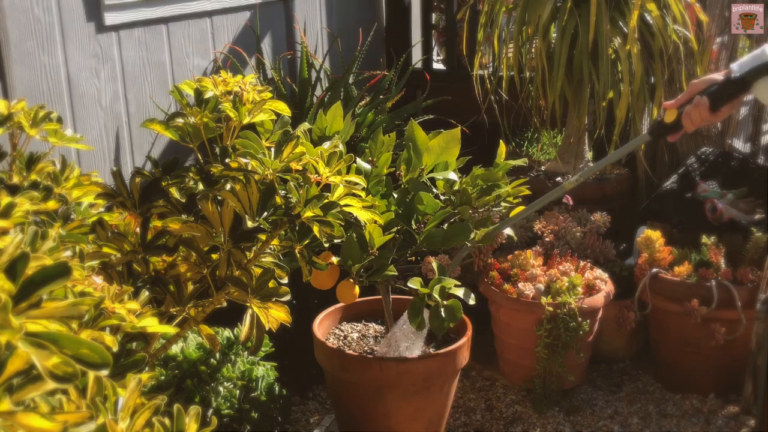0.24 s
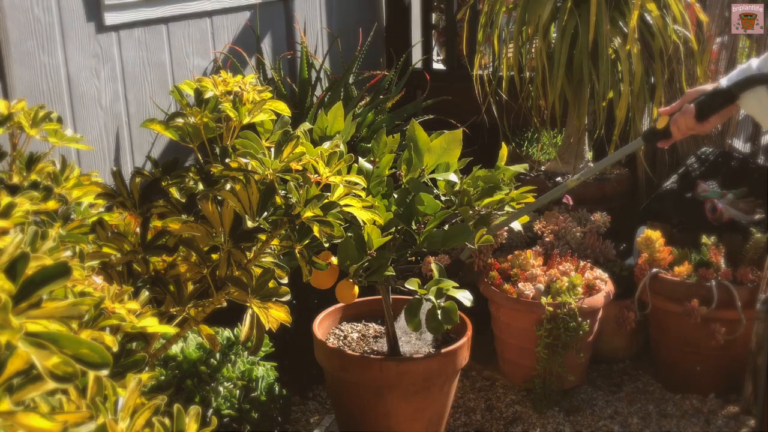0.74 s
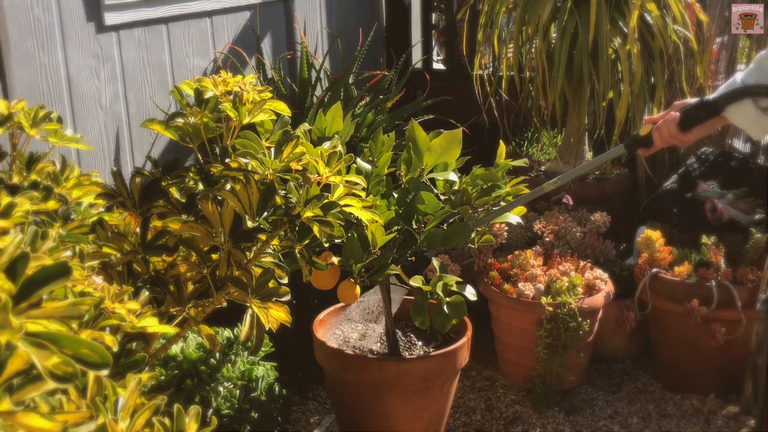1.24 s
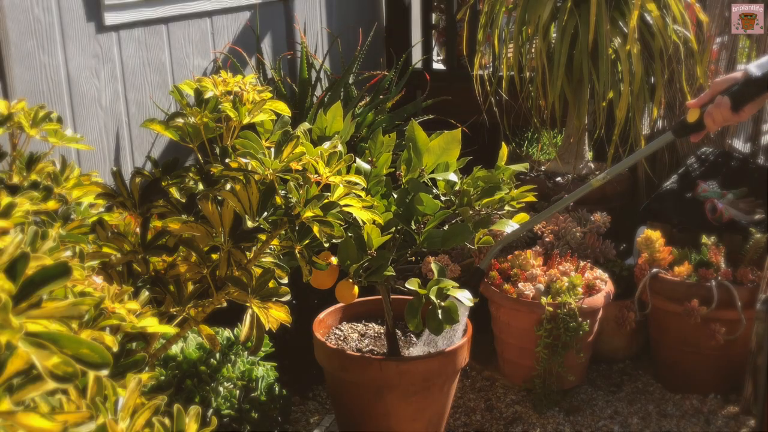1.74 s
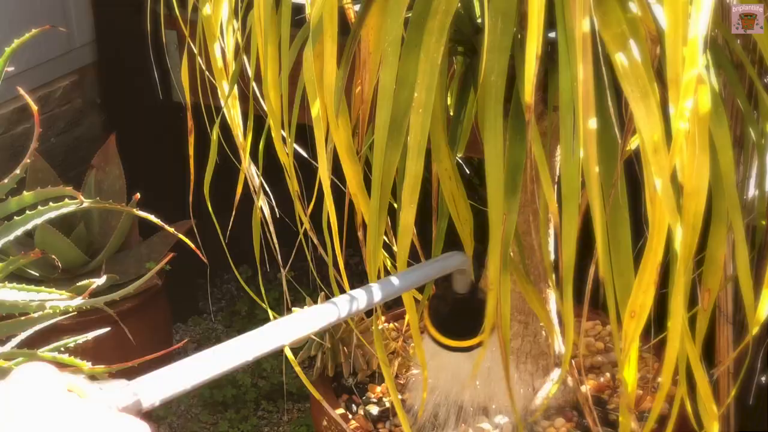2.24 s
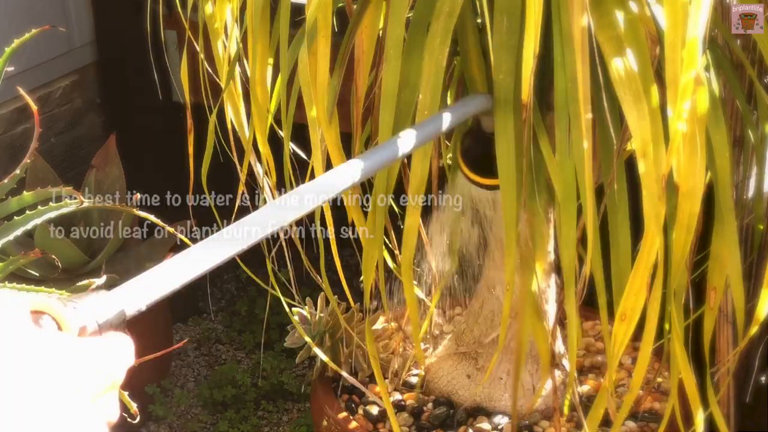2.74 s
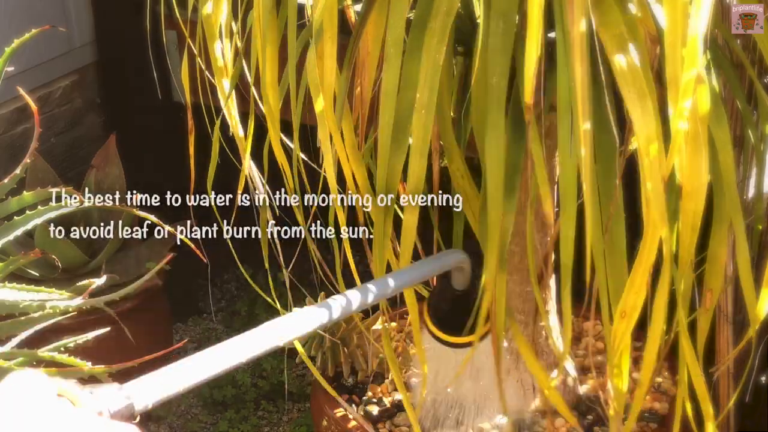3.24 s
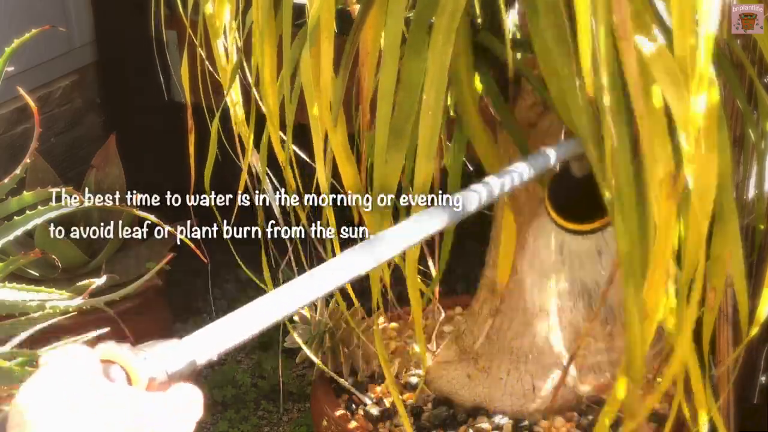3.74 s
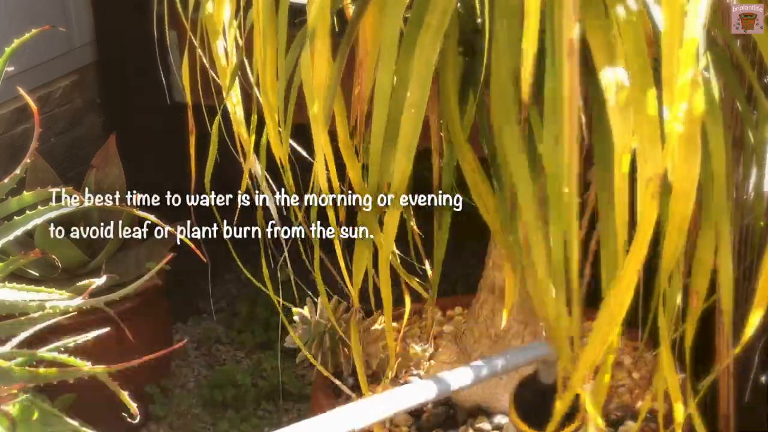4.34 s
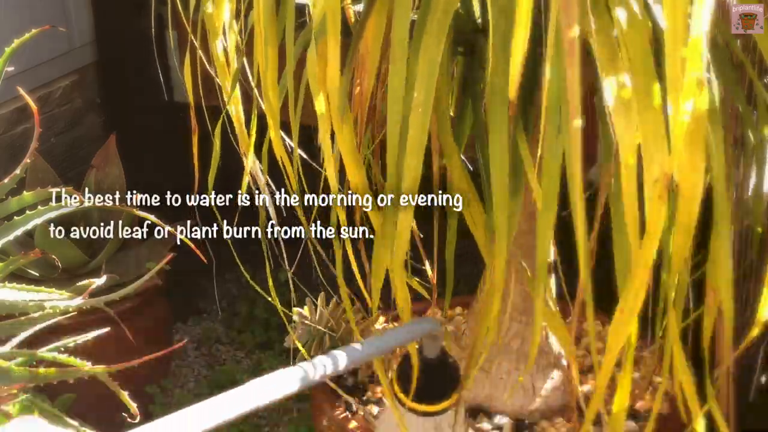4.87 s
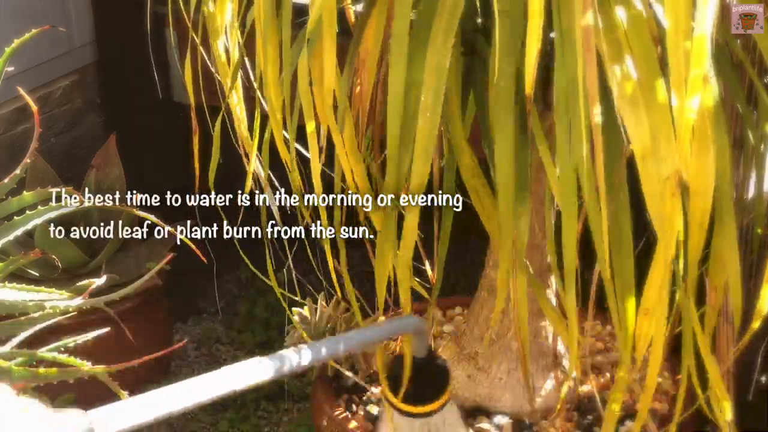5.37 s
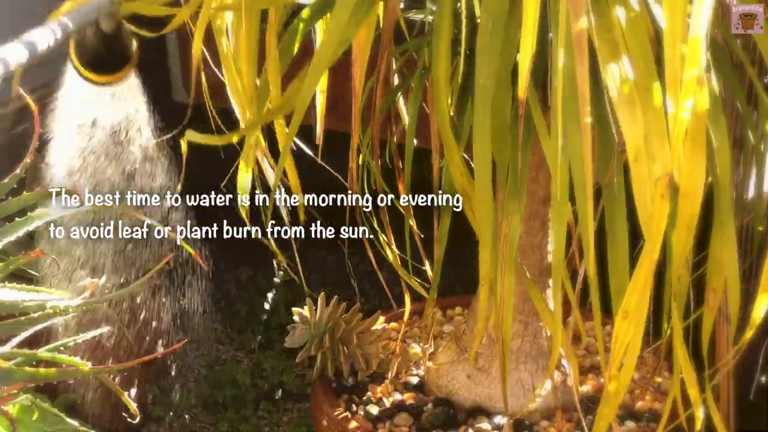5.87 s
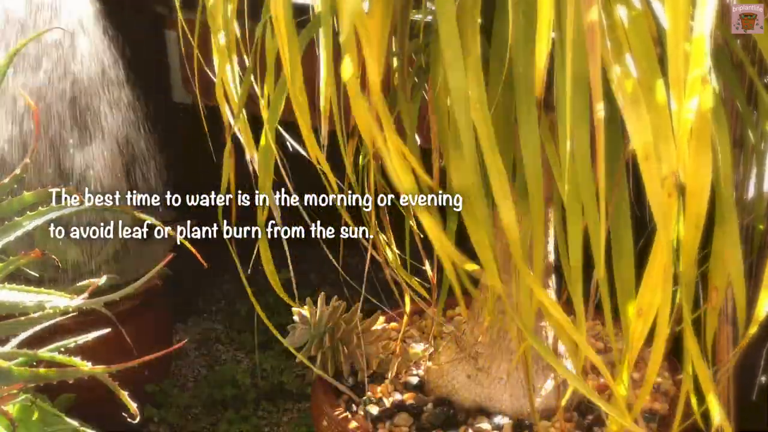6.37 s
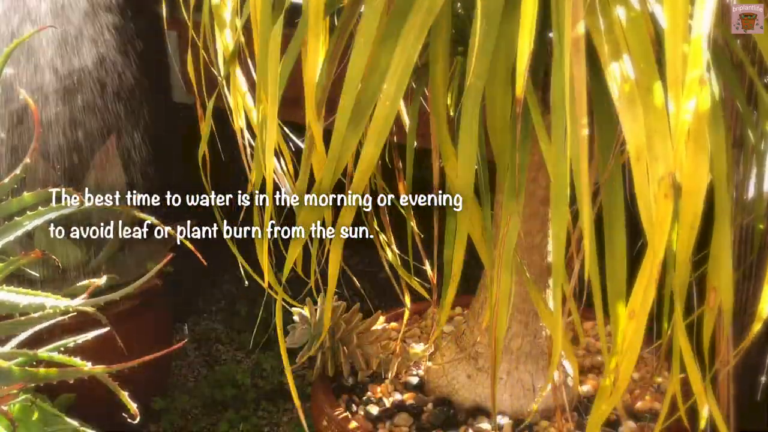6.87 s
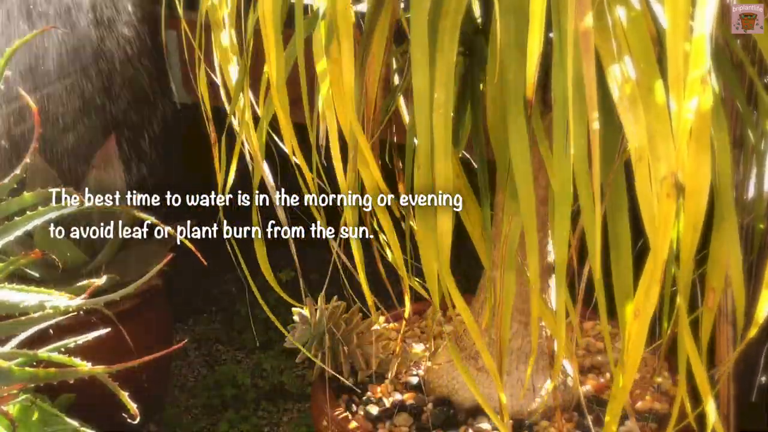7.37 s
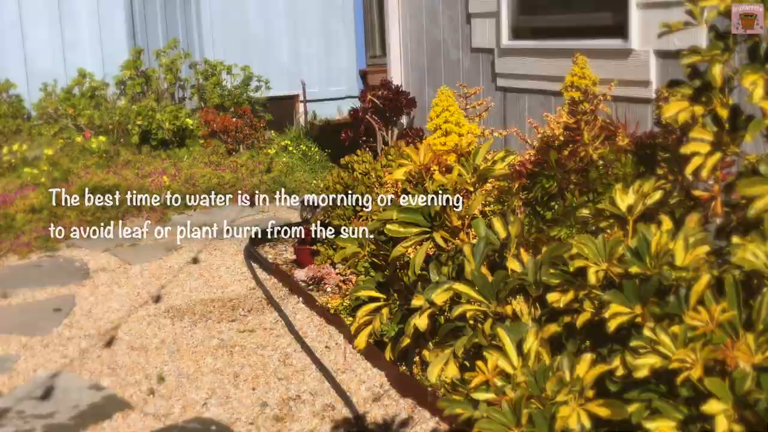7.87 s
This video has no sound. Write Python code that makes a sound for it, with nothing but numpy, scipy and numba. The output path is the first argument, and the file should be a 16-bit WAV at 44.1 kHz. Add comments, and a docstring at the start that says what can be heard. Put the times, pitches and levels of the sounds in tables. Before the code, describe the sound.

Hose spray hisses into a pot over a faint hum, then splatters loudly close up on leaves, drifts away, and cuts to near silence.

```python
"""A garden with potted plants, watered by a hose wand in three scenes that cut straight into each other:
a citrus pot a few steps away with a machine humming; close up, spray sweeping over long leaves and then
swinging off to a farther bed; a quiet path with a faint bird. Thousands of short damped tones make the
drop impacts, fizz, bubbles and drumming leaves. Noise bursts make single fat drops and faint hisses, shaped
noise makes the open air, and gliding tones make the hum and the bird."""
import sys
import numpy as np
from scipy import signal
from scipy.fft import rfft, irfft, next_fast_len
from scipy.io import wavfile
from scipy.ndimage import uniform_filter1d, map_coordinates
from numba import njit

SR = 44100
rng = np.random.default_rng(int(sys.argv[2]) if len(sys.argv) > 2 else 0)


def file_out(sig):
    """Save sig as 16-bit WAV at sys.argv[1]."""
    # one column per channel
    cols = np.atleast_2d(sig).T
    # limit, then scale
    lim = np.clip(cols, -1, 1)
    pcm = np.round(lim * 32767).astype(np.int16)
    wavfile.write(sys.argv[1], SR, pcm)


N = 357651
T = np.arange(N) / SR  # time of each sample in seconds

CUT_CLOSE, CUT_PATH = 2.276, 7.642  # starts of the second and third scene, s
TOP_HZ = 15850  # upper edge of the treble
# Bands in which a coloured layer has its stated level: lowest and highest Hz
SPLASH_BAND, FINE_BAND, BED_BAND = (4700, 8500), (9000, 15800), (3000, 8500)
LEAF_BAND, SOIL_BAND, AIR_BAND = (1800, 2400), (180, 330), (400, 1400)
REFERENCE_DB = -50  # splash level at which the fine droplets are just as loud, before any offset
SHATTER = 1.25  # dB of fine droplets per dB of splash: a harder stream breaks up finer
POT_FINE_DB, BRUSH_FINE_DB = -3, 5  # offset of the fine droplets in the pot; fine against splash on foliage
LEAF_BUBBLE_DB = -8  # steady bubbling against the splash
DRUM_DB = -69  # stray drops drumming on the long leaves between sweeps
LEAF_BEND = .03  # share by which the pitch of the leaves wanders as they bend under the water
PATCH_HZ = 1100  # spacing of the bands that flicker separately
PATCH_DEPTH, SURGE_DEPTH = 1.1, .75  # share of the flutter in each band, and in the whole stream
HUM_HZ, HUM_DB, HUM_FADE_DB_PER_S = 115.7, -68.5, 0.1
YARD_DB, PATH_DB = -68.5, -81  # open air in the first scene, and at the start of the third
PATH_SWELL_DB_PER_S = 13.5  # the air along the path starts hushed and grows
CHIRP_ROUGH_DB = 5  # how much the bird's level flickers
PUDDLE_HZ, PUDDLE_SPREAD = 4000, .06  # bubble pitch before tuning, and the share it varies either way
TICK_SPREAD = 0.00023  # octaves times decay in s: the longer a drop rings, the purer its pitch
TICK_CRACK_DB, SPLAT_CRACK_DB = -12.5, -7.5  # broad crack of a bursting drop, against its pitched part
PLINK_SPLASH_DB = -5.5  # little splash that opens each bubble, against its ring


def undb(db):
    """Turn decibels into gain."""
    return 10 ** (np.asarray(db) / 20)


def curves(table):
    """Join the values in each column of a table by straight lines in time."""
    s, *columns = np.transpose(table)
    return [np.interp(T, s, c) for c in columns]


def walk(count):
    """Smooth chance with count turns a second and a spread near 1."""
    k = SR // count
    steps = np.repeat(rng.standard_normal(N // k + 1), k)
    return 0.956 * uniform_filter1d(uniform_filter1d(steps, k), k)[:N]


def colour(x, points, band):
    """Give x a spectrum of (Hz, dB) points, with rms 1 inside the band; it falls away beyond both ends."""
    size = next_fast_len(N, True)
    f = np.maximum(np.arange(size // 2 + 1) * SR / size, 1)
    hz, db = np.transpose(points)
    ends = (np.minimum(hz[-1] / f, 1) * np.minimum(f / hz[0], 1)) ** 2
    shaped = rfft(x, size) * undb(np.interp(np.log(f), np.log(hz), db)) * ends
    inside = (f > band[0]) & (f < band[1])
    return irfft(shaped, size)[:N] * size / np.sqrt(2 * np.sum(np.abs(shaped[inside]) ** 2))


@njit
def ring(start, hz, cycles, size, glide):
    """Damped sines that lose 60 dB in the given cycles while their pitch rises by the share glide."""
    out = np.zeros(N)
    for k in range(len(start)):
        length = cycles[k] * SR / hz[k]
        first = int(start[k] * SR) + 1
        for i in range(max(first, 0), min(first + int(length) + 1, N)):
            age = i - start[k] * SR
            u = age / length
            phase = 2 * np.pi * hz[k] / SR * age * (1 + glide * u / 2)
            out[i] += size[k] * np.exp(-6.9 * u) * np.sin(phase)
    return out


def drops(lo_hz, hi_hz, ring_s, spread_db, glide, count):
    """A shower of count damped tones at random moments, each with its own pitch, size and length; rms 1."""
    when, pitch, weight, damping = rng.random((count, 4)).T
    hz = lo_hz + (min(hi_hz, .45 * SR) - lo_hz) * pitch
    rarity = -np.log(.02 + weight)  # near 0 for most drops, large for a few
    cycles = hz * ring_s * (.5 + damping)
    x = ring(when * N / SR, hz, cycles, undb(spread_db * rarity), float(glide))
    return x / np.std(x)


def burst(start, hz, octaves, decay_s, rise_s):
    """A dense burst too thick to tell apart: a swell and decay of noise around one pitch, peak 1."""
    t = T[:8192]
    f = np.maximum(np.arange(len(t) // 2 + 1) * SR / len(t), 1)
    around_pitch = np.exp(-.5 * (np.log2(f / hz) / octaves) ** 2)
    x = irfft(rfft(rng.standard_normal(len(t))) * around_pitch)
    x *= (1 - np.exp(-t / rise_s)) * np.exp(-t / decay_s)
    out, first = np.zeros(N + len(t)), int(start * SR)
    out[first:first + len(t)] = x / np.abs(x).max()
    return out[:N]


def scatter(x, t60, wet_db, count=3):
    """Pots, leaves and fence throw back a short tail; drops land in count places, each with its own echo."""
    t = T[:SR // 8]
    echo = 0
    for _ in range(count):
        tail = rng.standard_normal(len(t)) * undb(-60 * t / t60)
        share = np.cos(2 * np.pi * walk(count=40))  # the landing place wanders with the stream
        echo = echo + signal.oaconvolve(x * share, tail / np.linalg.norm(tail))[:N]
    return x + undb(wet_db) * echo * np.sqrt(2 / count)


def scene_gain(start, end, fade_s):
    """Gain of a scene that fades in quickly and stops dead."""
    return np.clip((T - start) / fade_s, 0, 1) ** 3 * (T < end)


def swell(middle_s, length_s):
    """The stream slides onto something and off again: a bell of power, half as strong at its two ends."""
    return .5 ** ((2 * (T - middle_s) / length_s) ** 2)


def passes(steady_db, rows, gain_db=0):
    """Gain of a layer: its steady level plus a swell for each (middle s, length s, dB) row, as powers."""
    swells = sum(undb(db + gain_db) ** 2 * swell(s, length) for s, length, db in rows)
    return np.sqrt(undb(steady_db) ** 2 + swells)


def shattered(flow_db):
    """Level of the fine droplets, which grows faster than the splash."""
    return REFERENCE_DB + SHATTER * (flow_db - REFERENCE_DB)


def patter(x, flutter_db):
    """Each clump of water strikes its own leaf or stone, so neighbouring bands flicker separately."""
    size = next_fast_len(N, True)
    spectrum = rfft(x, size)
    place = np.arange(len(spectrum)) * SR / size / PATCH_HZ
    out = 0
    for k in range(TOP_HZ // PATCH_HZ + 2):
        band = irfft(spectrum * np.maximum(1 - np.abs(place - k), 0), size)[:N]
        out = out + band * undb(PATCH_DEPTH * flutter_db * walk(count=85))
    # The flicker adds power on average; take that off again
    mean_power_db = (PATCH_DEPTH * flutter_db) ** 2 * np.log(10) / 20
    return out * undb(SURGE_DEPTH * flutter_db * walk(count=55) - mean_power_db)


def shower(click_spread_db, fizz_db, spatter_db, spatter_ring_s, wet_db):
    """Sharp impacts and the fizz of tiny bubbles; where the stream breaks into clumps, big drops spatter."""
    # How much the stream breaks into clumps. Each row: time in seconds, strength of the flutter.
    clumps = [(0, 1.2), (2.3, 1.4), (3.3, 0.8), (3.5, 3.3), (3.85, 3.5), (4.0, 1.0), (4.2, 3.5),
              (5.35, 2.8), (5.7, 1)]
    flutter_db, = curves(clumps)
    clicks = drops(730, 16900, ring_s=0.00052, spread_db=click_spread_db, glide=0, count=40000)
    fizz = drops(2780, 15870, ring_s=0.017, spread_db=6, glide=0.025, count=14000)
    big = drops(3400, 15500, ring_s=spatter_ring_s, spread_db=4.5, glide=0.04, count=4200)
    # Each big drop gets a short noisy tail, as it shatters into smaller ones
    spatter = scatter(big, t60=0.034, wet_db=-5.5) / 2
    share = undb(spatter_db) * flutter_db
    mix = clicks + undb(fizz_db) * fizz + share * spatter
    water = mix / np.sqrt(1 + undb(2 * fizz_db) + share ** 2)
    return scatter(patter(water, flutter_db), t60=0.063, wet_db=wet_db, count=2)


def citrus_pot():
    """The shower falls into a pot a few steps away and brushes the low foliage."""
    # How hard the stream lands in the pot. Each row: time in seconds, splash level in dB.
    flow = [(0, -48), (0.17, -51.5), (0.27, -56), (0.6, -54.5), (0.75, -56.5), (0.95, -53), (1.12, -63),
            (1.55, -60.5), (1.72, -63.5), (2.26, -61.5)]
    # Spray on the low foliage. Each row: middle in seconds, length in seconds, splash level in dB.
    brushes = [(0.107, 0.4, -62), (0.84, 0.051, -55.5), (1.327, 0.13, -69.5), (1.533, 0.1, -66)]
    # Tone of the splash, then of the fine droplets. Each row: frequency in Hz, relative level in dB.
    splash_tone = [(900, -29), (1700, -22), (2700, -16), (3400, -1.5), (3900, 2), (4350, -6), (4750, -0.5),
                   (5400, 1), (6300, -3.5), (7300, -1.5), (8400, -5), (10000, -14.5), (15000, -21)]
    fine_tone = [(5000, -40), (8500, -23), (10000, -8), (11500, -2.5), (13000, -2), (15300, 2)]
    flow_db, = curves(flow)
    water = shower(click_spread_db=-0.5, fizz_db=-5.0, spatter_db=-4.5, spatter_ring_s=0.0077, wet_db=-0.5)
    splash = passes(flow_db, brushes) * colour(water, splash_tone, SPLASH_BAND)
    fine_gain = passes(shattered(flow_db) + POT_FINE_DB, brushes, BRUSH_FINE_DB)
    fine = fine_gain * colour(water, fine_tone, FINE_BAND)
    return (splash + fine) * (T < CUT_CLOSE)


def air(points, db, waver_db):
    """Open-air rumble and murmur of the neighbourhood: shaped noise, gently wavering."""
    return undb(db + waver_db * walk(count=9)) * colour(rng.standard_normal(N), points, AIR_BAND)


def hum():
    """A machine behind the fence hums one low tone, a little unsteady and slowly weakening."""
    phase = 2 * np.pi * np.cumsum(HUM_HZ * (1 + 0.0078 * walk(count=10))) / SR
    level_db = HUM_DB - HUM_FADE_DB_PER_S * T + 0.43 * walk(count=12)
    return np.sqrt(2) * undb(level_db) * np.sin(phase)


def puddles():
    """Where the stream digs in, bubbles of nearly one size ring together; each puddle has its own pitch."""
    # Puddles stirred up. Each row: middle in seconds, length in seconds, level in dB, pitch in Hz.
    stirred = [(0.328, 0.088, -52.5, 3900), (0.53, 0.24, -53.5, 3875), (0.849, 0.064, -58, 3780),
               (1.858, 0.045, -52.5, 4010), (1.983, 0.087, -51, 3870), (2.61, 0.087, -47, 4320),
               (3.609, 0.18, -52, 4010), (3.845, 0.17, -50, 3650), (4.391, 0.087, -48.5, 3938),
               (4.59, 0.06, -50, 4124), (4.75, 0.12, -56, 3500), (5.452, 0.034, -64, 4180)]
    *_, hz = curves(stirred)
    lo_hz, hi_hz = PUDDLE_HZ * (1 - PUDDLE_SPREAD), PUDDLE_HZ * (1 + PUDDLE_SPREAD)
    bubbles = drops(lo_hz, hi_hz, ring_s=0.061, spread_db=3.5, glide=0.039, count=6000)
    # Playing the bubbles faster or slower tunes them
    tuned = map_coordinates(bubbles, [np.cumsum(hz / PUDDLE_HZ)], mode="mirror")
    return passes(-np.inf, [(s, length, db) for s, length, db, _ in stirred]) * tuned


def crack(start, decay_s):
    """The broad, bright burst of a drop breaking up; peak 1."""
    return burst(start, 8500, octaves=.75, decay_s=decay_s, rise_s=.0002)


def leaf_ticks():
    """Single drops snap on a leaf: a crack and, just after it, a short pitched burst."""
    # Each row: start in seconds, peak of the pitched part in dB, pitch in Hz, decay time in seconds.
    ticks = [(3.1168, -19, 9560, .0012), (3.9564, -23, 13500, .0007), (4.2388, -29, 14800, .002),
             (4.5341, -35, 7070, .002), (5.0868, -31, 10500, .002), (5.3838, -34, 12400, .002),
             (5.4585, -35, 13300, .002), (6.8174, -30.5, 10000, .001), (6.868, -42.5, 9200, .004),
             (7.078, -44, 8860, .005), (7.1125, -41, 9550, .004), (7.195, -49, 14200, .005),
             (7.2754, -41, 9000, .002), (7.7533, -42.5, 12800, .0014), (7.8735, -46, 8300, .0018),
             (7.9054, -55, 6470, .002), (8.0137, -54, 13200, .0015), (8.0691, -51, 7540, .002)]
    out = 0
    for s, db, hz, decay in ticks:
        pitched = burst(s + 0.00052, hz, octaves=TICK_SPREAD / decay, decay_s=decay, rise_s=0.00051)
        out = out + undb(db) * (pitched + undb(TICK_CRACK_DB) * crack(s, decay))
    return out


def splats():
    """Clumps of water slap down: a stronger crack, then a pitched burst."""
    # Each row: start in seconds, peak of the burst in dB, centre in Hz, decay time in seconds.
    slaps = [(0.828, -45, 3830, .004), (1.3457, -43, 5140, 0.01), (2.8215, -27, 5350, 0.0035),
             (3.031, -31, 7000, .003), (3.4362, -35, 3800, 0.01), (3.4955, -28, 3750, 0.005),
             (3.539, -38, 4600, .007), (3.5755, -30.5, 4200, 0.0042), (3.608, -36, 6900, 0.0045),
             (3.631, -38, 5200, 0.007), (3.713, -39, 6600, .005), (3.774, -31.5, 4600, 0.007),
             (3.806, -33, 12600, 0.0043), (3.9295, -27, 4600, 0.0025), (4.139, -36.5, 6230, .004),
             (4.16, -34, 4350, 0.011), (4.394, -32.5, 4300, 0.0047), (4.5692, -37.5, 4230, .012),
             (4.784, -31.5, 6800, 0.0059), (5.151, -41, 4400, .004), (5.1545, -34, 14100, 0.004),
             (5.1925, -33, 4300, 0.0041), (5.199, -32.5, 7050, 0.0024), (5.2555, -29.5, 8200, 0.005),
             (5.2806, -32, 7100, 0.0023), (5.325, -36, 7100, .005), (5.399, -34.5, 6100, 0.0039)]
    out = 0
    for s, db, hz, decay in slaps:
        pitched = burst(s + .001, hz, octaves=.2, decay_s=decay, rise_s=.0006)
        out = out + undb(db) * (pitched + undb(SPLAT_CRACK_DB) * crack(s, decay))
    return out


def plinks():
    """Larger bubbles in the puddles: a little splash, then a ring that rises slightly in pitch."""
    # Each row: start in seconds, level of the ring in dB, pitch in Hz.
    bubbles = [(1.763, -43, 4040), (1.8476, -43, 3700), (4.4246, -38, 3512), (4.624, -36, 4480),
               (5.031, -44, 4130), (5.5872, -46.5, 4930), (5.9383, -40, 3994), (6.795, -53, 2930),
               (6.866, -45.5, 3780), (6.913, -45, 4400), (7.049, -47, 3650), (7.0785, -45.5, 4020)]
    starts, levels_db, pitches = np.transpose(bubbles)
    out = ring(starts + 0.001108, pitches, 0.048 * pitches, undb(levels_db), 0.033)
    for s, db, hz in bubbles:
        splash = burst(s, 1.01 * hz, octaves=0.23, decay_s=0.0029, rise_s=0.0016)
        out = out + undb(db + PLINK_SPLASH_DB) * splash
    return out


def pats():
    """Hollow pats of the jet on leaves and into the soil: noise bursts that rise softly."""
    # Each row: start in seconds, peak in dB, centre in Hz, width in octaves, decay time in seconds.
    hits = [(4.415, -51, 245, .18, .03), (4.475, -48.5, 2180, .12, 0.015),
            (4.818, -48.5, 2090, .12, 0.0093), (5.119, -52, 750, .55, 0.008),
            (5.119, -51, 1680, .18, 0.006), (5.938, -49, 780, .65, 0.0038), (7.27, -62, 270, 0.2, 0.035),
            (7.295, -56.5, 1040, 0.17, 0.034), (7.627, -53, 2700, .16, .004)]
    return sum(undb(db) * burst(s, hz, octaves=width, decay_s=decay, rise_s=decay / 2)
               for s, db, hz, width, decay in hits)


def fat_drops():
    """Drops that stand out from the shower, with a short echo from their surroundings."""
    return scatter(splats() + plinks() + leaf_ticks() + pats(), t60=0.097, wet_db=-8)


def bend(x, share):
    """Let the pitch of x wander by a share."""
    place = np.cumsum(1 + share * walk(count=14))
    return map_coordinates(x, [place], order=1, mode="mirror")


def long_leaves():
    """Close up, the shower drums on strap leaves and bubbles in the soil under them."""
    # How hard the stream lands under the leaves. Each row: time in seconds, splash level in dB.
    flow = [(2.3, -46), (2.74, -51), (3.05, -47.5), (3.38, -46.5), (3.56, -51), (3.72, -54), (3.88, -47),
            (4.14, -51.5), (4.24, -55), (4.38, -50.5), (4.51, -59), (4.68, -55), (4.95, -60), (5.42, -56),
            (5.7, -68.5)]
    # The wand sweeps across the leaves. Each row: middle in seconds, length in seconds,
    # splash level in dB, drumming level in dB.
    sweeps = [(2.33, 0.12, -45.5, -63.5), (3.21, 0.2, -47.5, -54), (4.005, 0.14, -43, -58),
              (4.725, 0.07, -55, -63.5), (4.815, 0.1, -50, -67.5), (5.295, 0.1, -48, -66.5)]
    # Tones of splash, fine droplets and drummed leaves. Each row: frequency in Hz, relative level in dB.
    splash_tone = [(900, -46), (1600, -41), (2650, -19.5), (3050, -3.5), (3350, 6), (4250, 5), (4900, 6.5),
                   (6100, 4.5), (7600, 6.5), (9000, 1.5), (11000, -33), (15000, -0.5)]
    fine_tone = [(5000, -60), (8000, -11.5), (9300, 0.5), (11500, 5), (13500, 3), (15500, 4.5)]
    leaf_tone = [(1000, -37), (1650, -4), (1880, -13.5), (2080, 3.5), (2300, -15), (2600, -4), (3600, -13)]
    flow_db, = curves(flow)
    splashing = [(s, length, db) for s, length, db, _ in sweeps]
    drumming = [(s, length, db) for s, length, _, db in sweeps]
    water = shower(click_spread_db=0.5, fizz_db=-8.0, spatter_db=-2.5, spatter_ring_s=.0075, wet_db=-1.0)
    splash = passes(flow_db, splashing) * colour(water, splash_tone, SPLASH_BAND)
    fine = passes(shattered(flow_db), splashing) * colour(water, fine_tone, FINE_BAND)
    bubbling = drops(3324, 4518, ring_s=0.068, spread_db=1.5, glide=0.11, count=3500)
    bubbles = undb(flow_db + LEAF_BUBBLE_DB) * bubbling
    taps = drops(1810, 2660, ring_s=0.0071, spread_db=0.5, glide=0, count=7000)
    drum = passes(DRUM_DB, drumming) * bend(colour(taps, leaf_tone, LEAF_BAND), LEAF_BEND)
    return splash + fine + bubbles + drum


def far_bed():
    """Farther off the shower is a smooth wash heard mostly by its echo, while wet leaves nearby drip."""
    # Spray that misses the big pot. Each row: time in seconds, splash level in dB, fine droplets in dB.
    bed = [(4.2, -56.5, -88), (4.75, -55, -85), (5.0, -58, -81), (5.35, -54.5, -72), (5.7, -60, -80),
           (5.946, -61.5, -77), (6.582, -63.5, -68.5), (7.03, -61.5, -70), (7.228, -61, -67),
           (7.486, -64, -73.5), (7.62, -62.5, -70)]
    # Tone of the wash, then of the drips. Each row: frequency in Hz, relative level in dB.
    wash_tone = [(900, -10.5), (1600, -10.5), (2150, -2.5), (2900, -5.5), (3300, 1.5), (3600, -1),
                 (4250, 2.5), (4900, -0.5), (5600, -4), (7200, -6), (9000, -12.5), (14000, -17.5)]
    drip_tone = [(6000, -24), (8000, -11), (9700, -10), (12000, -11), (15000, -4)]
    splash_db, fine_db = curves(bed)
    impacts = drops(1210, 14000, ring_s=0.002, spread_db=2.0, glide=0, count=50000)
    wash = colour(scatter(impacts, t60=0.078, wet_db=7.0, count=2), wash_tone, BED_BAND)
    dripping = drops(4200, 16200, ring_s=0.004, spread_db=3, glide=0, count=6000)
    drips = colour(scatter(dripping, t60=0.063, wet_db=-1), drip_tone, FINE_BAND)
    return undb(splash_db) * wash + undb(fine_db) * drips


def soil():
    """The jet pounds the potting soil of the big pot with soft low thuds."""
    # How hard it pounds. Each row: time in seconds, level in dB.
    pounding = [(2.35, -79), (2.5, -69), (3.4, -72.5), (3.55, -69.5), (4.05, -67.5), (4.3, -64.5),
                (4.72, -69), (4.92, -70), (5.45, -71.5), (5.8, -84), (7.6, -77)]
    # Tone of the thuds. Each row: frequency in Hz, relative level in dB.
    thud_tone = [(60, -37), (130, -4.5), (190, 2.5), (250, 6), (300, 0.5), (400, -7.5), (900, 8)]
    level_db, = curves(pounding)
    thuds = drops(90, 440, ring_s=0.037, spread_db=2.0, glide=0, count=3500)
    return undb(level_db) * colour(thuds, thud_tone, SOIL_BAND)


def chirp(start, length_s, first_hz, middle_hz, last_hz):
    """A thin, broken whistle that swells and fades while it glides shakily through three pitches."""
    u = np.clip((T - start) / length_s, 0, 1)
    glide_hz = np.interp(u, [0, .5, 1], [first_hz, middle_hz, last_hz])
    hz = glide_hz * (1 + .025 * walk(count=300))
    level = np.sin(np.pi * u) ** 2 * undb(CHIRP_ROUGH_DB * walk(count=200))
    return level * np.sin(2 * np.pi * np.cumsum(hz) / SR)


def path():
    """A quiet spot: open air, a few faint soft bursts of hiss and a small bird far off."""
    # Faint soft bursts of hiss. Each row: start in seconds, peak in dB, centre in Hz, width in octaves.
    hiss_rows = [(7.668, -59.5, 4300, 0.25), (7.82, -62, 7500, 0.94), (7.935, -62, 8950, 0.93),
                 (8.008, -54, 13000, 0.29)]
    # The bird. Each row: start in seconds, length in seconds, level in dB, first, middle and last pitch in Hz.
    chirps = [(7.693, .045, -67, 4480, 5030, 4750), (7.728, 0.049, -78, 4270, 3820, 3450),
              (7.82, 0.042, -73, 4270, 4200, 3780), (7.945, 0.11, -77, 3600, 3920, 3750)]
    # Tone of the open air. Each row: frequency in Hz, relative level in dB.
    air_tone = [(46, -16), (82, 11), (195, 8), (560, -1.5), (960, 1.5), (2750, -12), (4000, -9),
                (6100, -18), (15200, -26)]
    hisses = sum(undb(db) * burst(s, hz, octaves=width, decay_s=0.014, rise_s=0.0081)
                 for s, db, hz, width in hiss_rows)
    bird = sum(undb(db) * chirp(s, length, *pitches) for s, length, db, *pitches in chirps)
    air_db = PATH_DB + PATH_SWELL_DB_PER_S * (T - CUT_PATH)
    breeze = air(air_tone, air_db, waver_db=1) * scene_gain(CUT_PATH, np.inf, fade_s=.016)
    return hisses + scatter(bird, t60=0.14, wet_db=-5.0, count=1) + breeze


def scene():
    """Three scenes in a row; in the second the wand swings from the leaves to the farther bed."""
    # Tone of the open air in the first and second scene. Each row: frequency in Hz, relative level in dB.
    yard_tone = [(40, -17), (80, 8.5), (150, 8.5), (300, 4.5), (450, 2), (850, 2.5), (1400, -0.5),
                 (2200, 4), (3000, 8)]
    garden_tone = [(45, -27), (76, 6.5), (130, 5.5), (170, -1), (400, -3), (1000, -4), (1500, -4)]
    # Open air in the second scene. Each row: time in seconds, level in dB.
    garden_air = [(2.36, -78.5), (2.7, -70.5), (5.6, -72.5), (5.95, -69), (6.3, -76.5), (6.9, -73),
                  (7.15, -74.5), (7.5, -75)]
    first = citrus_pot() + (air(yard_tone, YARD_DB, waver_db=2.0) + hum()) * (T < CUT_CLOSE)
    swing = np.clip((T - 5.64) / 0.32, 0, 1)  # 0 on the leaves, 1 once the wand has left them
    water = np.sqrt(1 - swing) * long_leaves() + far_bed()
    garden_db, = curves(garden_air)
    lows = soil() + air(garden_tone, garden_db, waver_db=1.4)
    second = water * scene_gain(CUT_CLOSE, CUT_PATH, fade_s=0.032)
    second = second + lows * scene_gain(CUT_CLOSE, CUT_PATH, fade_s=0.069)
    return (first + second + puddles() + path() + fat_drops())[None]


def record(dry):
    """A steep filter removes nearly everything above TOP_HZ."""
    return signal.sosfilt(signal.ellip(12, .1, 70, TOP_HZ, fs=SR, output="sos"), dry)


dry = scene()
out = record(dry)
file_out(out)
```